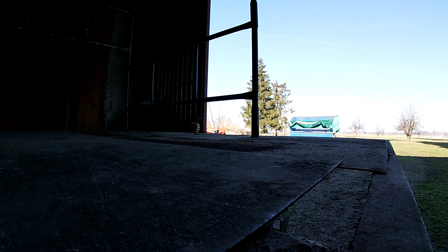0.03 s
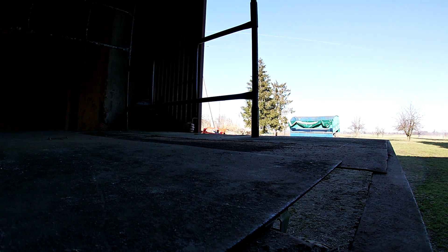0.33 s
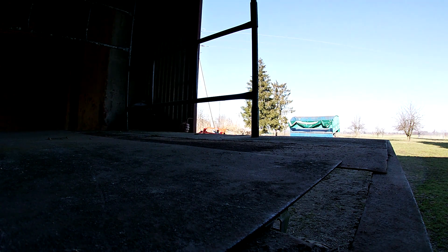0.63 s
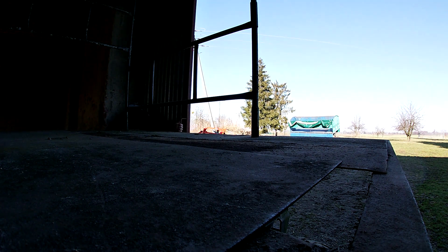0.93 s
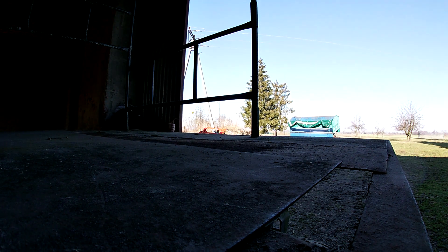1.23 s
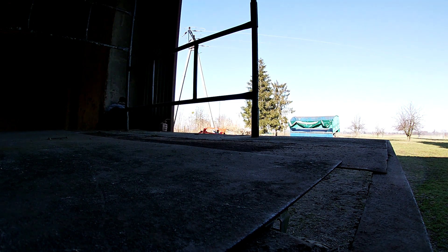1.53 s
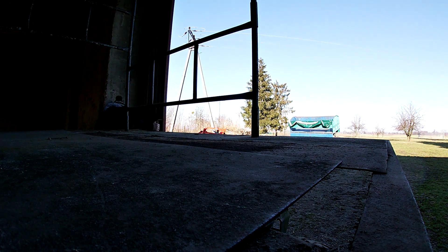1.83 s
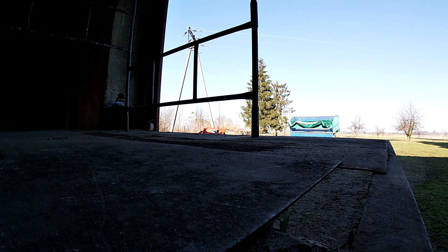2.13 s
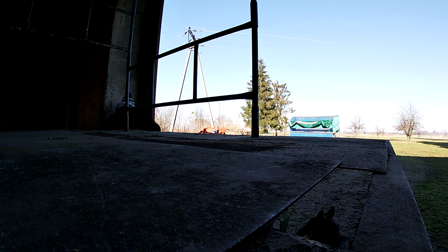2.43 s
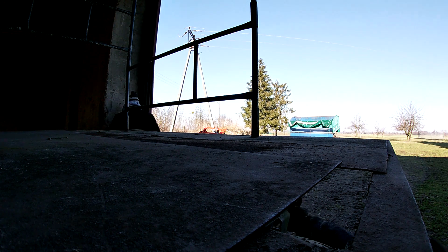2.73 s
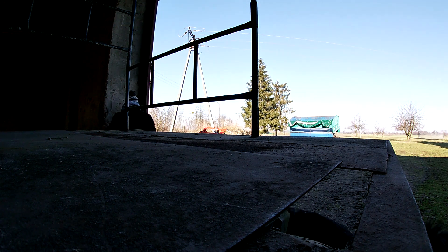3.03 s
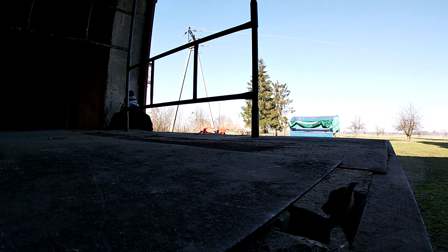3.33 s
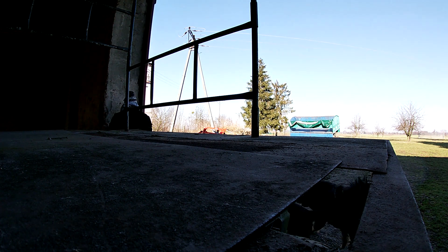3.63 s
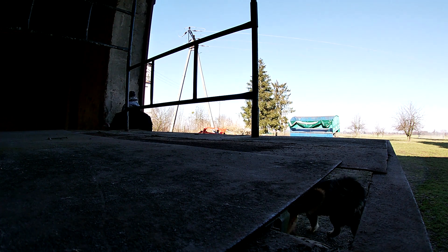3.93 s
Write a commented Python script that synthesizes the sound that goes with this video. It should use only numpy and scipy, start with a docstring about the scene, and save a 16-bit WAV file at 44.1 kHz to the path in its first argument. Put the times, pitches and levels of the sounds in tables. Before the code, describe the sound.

A heavy sheet-metal door rolls open a few metres away in a reverberant farm building. Its hangers tick lightly at first, and at about 0.7 seconds it breaks free with a dull boom. It rumbles along the track with gritty grinding, uneven knocks and rattling fittings. Its edge scrapes briefly at 2 seconds. From about 3 seconds it slows, fading toward faint outdoor air by 4 seconds.

```python
"""A rolling sheet-metal door

A heavy door rolls open along its track in a farm building, a few metres away. The hangers tick as it
takes up the push; it breaks free with a boom, and the rollers jolt the panel's modes into a rumble,
grind over grit and rattle the fittings. Halfway its edge scrapes briefly, then it slows.
The bare building reverberates."""
import sys
import numpy as np
from scipy import signal
from scipy.fft import rfft, irfft, next_fast_len
from scipy.io import wavfile

SR = 44100
rng = np.random.default_rng(int(sys.argv[2]) if len(sys.argv) > 2 else 0)


def generate_wav(sig):
    """Save sig (samples, or channels by samples) to the path in sys.argv[1] as 16-bit PCM at SR."""
    pcm = np.round(np.clip(np.atleast_2d(sig).T, -1, 1) * 32767).astype(np.int16)
    wavfile.write(sys.argv[1], SR, pcm)


N = 176400

# Modes of the panel. Each row: frequency in Hz, bandwidth in Hz, gain in dB.
PANEL_MODES = [(110.7, 9.8, -9.5), (145.4, 15.3, 4), (205.2, 32.4, -4.5), (247.2, 18.2, -1.5),
               (278.2, 25, -5), (315, 30, -6), (380.5, 43, -6), (528.2, 31, -9.5), (602, 36, -12),
               (740, 23, -18.5), (797, 19, -16.5)]
# Reverberation of the building. Each row: frequency in Hz, time to fall 60 dB in seconds.
BARN_DECAY = [(100, 0.83), (500, 0.67), (3000, 0.46), (8000, 0.33), (14000, 0.064)]

# Spectra of the sources. Each row: frequency in Hz, relative spectral density in dB.
AIR_SPECTRUM = [(35, 6), (70, -8.5), (160, -28), (325, -18), (970, -23), (1900, -30.5), (7200, -54),
                (8800, -84), (10000, -80), (12000, -94), (15000, -100)]
SHUDDER_SPECTRUM = [(10, -26), (22, -16), (30, -5.5), (37, -5), (44, -5), (54, -19), (75, -18.5),
                    (300, -99)]
TRACK_SPECTRUM = [(200, -25), (450, 1.5), (700, 3), (1000, -1), (1400, -1.5), (1800, -6.5), (2300, -13.5),
                  (3200, -11.5), (4500, -23), (7300, -26), (8800, -44), (10000, -42), (11500, -61),
                  (15000, -79)]
FINE_SPECTRUM = [(800, -26), (2200, 4), (3300, 3), (5000, 1), (7400, -3.5), (8700, -15), (10000, -17.5),
                 (11500, -28), (14000, -30), (15000, -37)]  # grit and loose fittings
SHEET_SPECTRUM = [(30, -34.5), (60, -7), (110, -3.5), (150, -5), (280, -2), (420, -8), (650, -24),
                  (1200, -26.5), (3000, -86), (10000, -110)]
HANGER_SPECTRUM = [(300, -30.5), (900, 3), (2000, -4), (3300, 1), (5000, -2), (7400, -5), (8700, -17),
                   (10200, -18), (11500, -29), (13800, -30), (15000, -53)]
LURCH_SPECTRUM = [(90, -36), (140, -2), (240, 0.5), (400, -4.5), (480, -22), (1200, -66)]
SCRAPE_SPECTRUM = [(200, -21), (500, 5), (750, 7.5), (1400, 2), (2000, -4), (3000, -8), (4500, -21.5),
                   (7300, -20.5), (9000, -40), (14000, -53)]

# Envelopes of the sustained sounds. Each row: time in seconds, relative level in dB.
SHUDDER_LEVEL = [(0.0, -43), (0.37, -33.5), (1.12, -35), (1.14, -33), (1.51, -32), (1.64, -32), (1.71, -40),
                 (1.77, -28), (1.87, -38), (2.08, -23), (2.12, -31), (2.24, -28), (2.28, -37.5),
                 (4.0, -43.5)]
GRIND_LEVEL = [(0.0, -53.5), (0.14, -46.5), (0.38, -52), (0.43, -44), (0.7, -46), (0.73, -36), (0.82, -43),
               (0.83, -36), (1.1, -35), (1.4, -39), (1.43, -35), (1.89, -34.5), (2.06, -28.5), (2.24, -34),
               (3.11, -44), (3.2, -41), (3.82, -52), (4.0, -53.5)]
FINE_LEVEL = [(0.06, -57.5), (0.29, -58), (0.34, -63), (0.42, -57), (0.46, -63), (0.58, -49.5), (0.69, -55),
              (0.71, -48.5), (0.81, -50.5), (0.85, -45), (1.51, -45.5), (1.52, -44.5), (1.93, -42),
              (2.14, -34.5), (2.23, -44), (2.34, -42.5), (2.52, -47), (3.25, -50), (3.78, -62),
              (3.98, -60.5)]  # grit and loose fittings
# Envelope of the rumble. Each row: time in seconds, level in dB, relative weight of upper modes in dB.
RUMBLE_LEVEL = [(0.02, -41, 1.5), (0.42, -36.5, -7.5), (0.69, -33, 0), (0.74, -28.5, 5), (0.87, -23, -1.5),
                (1.01, -28.5, 1.5), (1.07, -23, -0.5), (1.12, -21, 3), (1.15, -19, -11), (1.18, -24.5, 0),
                (1.26, -24, -2), (1.33, -20.5, -8.5), (1.38, -27, -1), (1.55, -24.5, -2), (1.72, -22, -1.5),
                (1.78, -24.5, 5), (1.84, -24.5, -7.5), (2.07, -25, 2.5), (2.2, -24.5, -8),
                (2.32, -20.5, -16.5), (2.37, -23, -5.5), (2.52, -28.5, -7), (2.62, -26.5, -13),
                (2.68, -29, -7.5), (2.83, -27.5, -2.5), (3.06, -26, -6), (3.2, -31, 3), (3.29, -30, 0),
                (3.44, -31, -0.5), (3.72, -40, -3), (3.98, -43.5, -3)]

# Knocks of the hangers. Each row: start in seconds, relative level in dB, treble over midrange in dB.
HANGER_KNOCKS = [(0.0473, -39.5, 6), (0.0792, -40, 19), (0.1147, -36, -6), (0.152, -40.5, 2),
                 (0.218, -36.5, -6), (0.2643, -38.5, 1.5), (0.2883, -39, -7), (0.3694, -38, 2),
                 (0.392, -37, 4), (0.4124, -30, 7), (0.4362, -34.5, 9), (0.49, -40, 2), (0.509, -33, 4),
                 (0.532, -42, 10), (0.5622, -32.5, 6), (0.582, -40, -5), (0.603, -34, 0), (0.7073, -31, 5),
                 (0.7418, -27, -16), (0.848, -31, 7), (0.882, -29, -16), (0.9433, -29, 3),
                 (0.9584, -23, -9), (1.0088, -28.5, 2), (1.067, -29.5, -12), (1.096, -33, 4),
                 (1.179, -29.5, -3), (1.2469, -27.5, -7), (1.3667, -47, 0), (1.4027, -48, -3),
                 (1.4208, -22.5, -15), (1.463, -34, -4), (1.5244, -23.5, -3), (1.5782, -29.5, -3.5),
                 (1.625, -24.5, -5), (1.6656, -25.5, -10), (1.7202, -23, -7), (1.7777, -30.5, 0),
                 (1.935, -42, -9), (1.993, -23, -25), (2.0398, -23.5, -11), (2.145, -27, 6),
                 (2.264, -30, 7), (2.3188, -26.5, 3), (2.3761, -27, -1), (2.421, -35, 7), (2.485, -32, -8),
                 (2.597, -35, 2), (2.6573, -35, 8), (2.8913, -36.5, 0), (2.9684, -30.5, -11),
                 (3.0934, -36.5, 3), (3.1591, -30, -4.5), (3.2936, -41, 2), (3.333, -43, 0),
                 (3.3512, -35.5, -6), (3.415, -40.5, 2), (3.592, -33.5, -10), (3.77, -52, 7),
                 (3.8252, -45, -1)]
# Uneven spots in the track. Each row: start in seconds, relative level in dB,
# clank over boom in dB, centre of the boom in Hz.
TRACK_BUMPS = [(.29, -26.5, -24, 205), (.385, -23.5, -21, 144), (.51, -20.5, -18, 145),
               (.62, -23.5, -24, 145), (0.717, -18.5, -20, 280), (0.745, -12, -23, 220),
               (.829, -15.5, -15, 320), (0.853, -16, -21, 240), (1.06, -12.5, -11, 250),
               (1.101, -17.5, -16, 245), (1.136, -15, -27, 144), (1.228, -14, -20, 205),
               (1.311, -19, -24, 162), (1.41, -11.5, -15, 218), (1.53, -11.5, -10, 250),
               (1.625, -14.5, -18, 145), (1.679, -14.5, -13, 280), (1.786, -18, -11, 205),
               (1.821, -13, -21, 160), (1.865, -11.5, -30, 205), (1.931, -13.5, -8.5, 245),
               (2.176, -15, -15, 144), (2.232, -16, -18, 145), (2.317, -15.5, -16, 159),
               (2.42, -18, -20, 145), (2.713, -12.5, -22, 213), (2.842, -14.5, -21, 280),
               (2.9, -21, -24, 205), (2.97, -25, -13, 205), (3.039, -21.5, -23, 190),
               (3.279, -18.5, -24, 205), (3.342, -19.5, -22, 160), (3.602, -25.5, -13, 324),
               (3.766, -30.5, -24, 247)]


def amp(db):
    """Amplitude ratio for a level in decibels."""
    return 10 ** (np.asarray(db) / 20)


def unit(x):
    """The signal scaled to an rms of 1."""
    return x / np.sqrt(np.mean(x ** 2) + 1e-20)


def evened(x, span_s=0.07):
    """Division by the running rms holds a signal near an rms of 1."""
    window = np.hanning(int(span_s * SR))
    power = abs(signal.fftconvolve(x * x, window / window.sum(), "same"))
    return x / np.sqrt(power + np.mean(x * x) / 20)


def along(points, hz):
    """Interpolation of (Hz, value) points on a logarithmic frequency axis."""
    f, values = np.transpose(points)
    return np.interp(np.log(hz + 1), np.log(f + 1), values)


def curve(rows):
    """Linear interpolation of (seconds, value) points at every sample."""
    return np.interp(np.arange(N) / SR, *np.transpose(rows))


def filtered(x, response):
    """Linear filtering: the spectrum is multiplied by a frequency response."""
    size = next_fast_len(len(x) + 8192)
    return irfft(rfft(x, size) * response(np.fft.rfftfreq(size, 1 / SR)), size)[:len(x)]


def coloured(x, spectrum, size=4096):
    """Minimum-phase filtering: folding the cepstrum gives a causal filter with this spectrum."""
    cepstrum = irfft(np.log(amp(along(spectrum, np.fft.rfftfreq(size, 1 / SR)))))
    cepstrum[1:size // 2] *= 2
    cepstrum[size // 2 + 1:] = 0
    return signal.fftconvolve(x, irfft(np.exp(rfft(cepstrum))))[:len(x)]


def dying(t, t60_s):
    """Exponential decay, 60 dB in t60_s."""
    return np.exp(-np.log(1000) * t / t60_s)


def swell(t, rise_s, fall_at_s, t60_s):
    """An envelope that rises linearly, holds, then decays exponentially."""
    return np.minimum(t / rise_s, 1) * dying(np.maximum(t - fall_at_s, 0), t60_s)


def add(track, start_s, sound):
    """Superposition of a sound on the track."""
    i = max(round(start_s * SR), 0)
    track[i:i + len(sound)] += sound[:max(N - i, 0)]


def contacts(per_s, scatter_db):
    """A Poisson train of impulses of uneven size and either sign."""
    hit, size = rng.random(N) < per_s / SR, rng.standard_normal(N)
    return hit * rng.choice([-1, 1], N) * amp(scatter_db * np.clip(size, -2, 2))


def panel(force, cutoff_hz=1100):
    """The sheet responds as a sum of damped modes; its mass suppresses the treble."""
    def response(f):
        modes = sum((-1) ** k * amp(db) * 1j * f * width / (hz * hz - f * f + 1j * f * width)
                    for k, (hz, width, db) in enumerate(PANEL_MODES))
        return modes / (1 + 1.4j * f / cutoff_hz - (f / cutoff_hz) ** 2)
    return filtered(force, response)


def barn(x, wet_db, positions=61):
    """Direct sound plus diffuse reverberation, cross-faded from place to place as the door travels."""
    echo, step = np.zeros(N), N // (positions - 1)
    hz, t, noise = signal.stft(rng.standard_normal((positions, SR // 3)), SR, nperseg=256)
    tails = signal.istft(noise * dying(t, along(BARN_DECAY, hz)[:, None]), SR)[1]
    for k, tail in enumerate(tails):
        at = np.arange(max((k - 1) * step, 0), min((k + 1) * step, N))
        share = np.sqrt(np.maximum(1 - abs(at / step - k), 0))
        add(echo, at[0] / SR, signal.fftconvolve(x[at] * share, tail / np.linalg.norm(tail)))
    return (x + amp(wet_db) * echo) / np.sqrt(1 + amp(wet_db) ** 2)


def air(level_db=-41):
    """Stationary noise, strongest in the bass, forms the quiet outdoor background."""
    return amp(level_db) * unit(coloured(rng.standard_normal(N), AIR_SPECTRUM))


def shudder(gain_db=1):
    """Whole-body vibration: the door shakes at low frequency on its hangers."""
    shaking = filtered(rng.standard_normal(N), lambda hz: amp(along(SHUDDER_SPECTRUM, hz)))
    return unit(shaking) * amp(curve(SHUDDER_LEVEL) + gain_db)


def grinding(coarse_db=1, fine_db=-4):
    """Rolling noise: dense tiny impacts as the rollers grind along the track and crush rust and grit."""
    coarse = barn(coloured(contacts(per_s=1800, scatter_db=1.5), TRACK_SPECTRUM), wet_db=-6)
    fine = barn(coloured(contacts(per_s=4500, scatter_db=2.5), FINE_SPECTRUM), wet_db=-4)
    return (unit(coarse) * amp(curve(GRIND_LEVEL) + coarse_db)
            + unit(fine) * amp(curve(FINE_LEVEL) + fine_db))


def rumble(split_hz=235.5, upper_db=1):
    """Forced vibration: roller jolts keep the modes ringing, in a balance set by where the rollers are."""
    jolts, rows = contacts(per_s=400, scatter_db=2), np.array(RUMBLE_LEVEL)
    ringing = unit(barn(panel(jolts), wet_db=-0.5))
    broadband = unit(barn(coloured(jolts, SHEET_SPECTRUM), wet_db=3.5))
    body = unit(ringing + broadband)
    lower = filtered(body, lambda hz: 1 / (1 + (hz / split_hz) ** 8))
    upper_gain = amp(curve(rows[:, [0, 2]]) + upper_db)
    balanced = (evened(lower) + upper_gain * evened(body - lower)) / np.hypot(1, upper_gain)
    return balanced * amp(curve(rows[:, :2]))


def rattling(gain_db=-5.5):
    """Intermittent contact: loose fittings chatter at random, harder where the track is rougher."""
    t = np.arange(SR // 4) / SR
    strikes = contacts(per_s=110, scatter_db=2)
    bursts = signal.fftconvolve(abs(strikes), dying(t, t60_s=0.012))[:N]
    chatter = barn(coloured(bursts * rng.standard_normal(N), FINE_SPECTRUM), wet_db=-3.5)
    return unit(chatter) * amp(curve(FINE_LEVEL) + gain_db)


def clacks(split_hz=2500, crack_db=-21, gain_db=-9):
    """Steel-on-steel impacts of the hangers are brief, hence broadband: a crack and a short buzz."""
    out, t = np.zeros(N), np.arange(SR // 4) / SR
    envelope = dying(t, t60_s=0.074) + amp(crack_db) * dying(t, t60_s=0.015)
    for start_s, db, bright_db in HANGER_KNOCKS:
        knock = coloured(rng.standard_normal(len(t)) * envelope, HANGER_SPECTRUM)
        midrange = signal.lfilter(*signal.butter(1, split_hz, fs=SR), knock)
        knock = knock + (amp(-bright_db) - 1) * midrange
        add(out, start_s, amp(db + gain_db) * knock / np.std(knock[:SR // 200]))
    return barn(out, wet_db=-2.5)


def bumps(focus_q=2.25, gain_db=-13):
    """Impact excitation: a roller drops, the track clanks and the modes driven from that spot boom."""
    out, t = np.zeros(N), np.arange(SR // 2) / SR
    onset = slice(SR // 20)  # the first 50 ms set the level
    for start_s, db, clank_db, hz in TRACK_BUMPS:
        ring = panel(rng.standard_normal(len(t)) * dying(t, t60_s=0.083))
        boom = filtered(ring, lambda f: 1j * f * hz / (focus_q * (hz * hz - f * f) + 1j * f * hz))
        clank = coloured(rng.standard_normal(len(t)) * dying(t, t60_s=0.25), TRACK_SPECTRUM)
        bump = boom / np.std(boom[onset]) + amp(clank_db) * clank / np.std(clank[onset])
        add(out, start_s, amp(db + gain_db) * bump)
    return out


def lurch(start_s=0.71, boom_db=-20.5, hum_hz=141.2, hum_db=-21.5):
    """Free vibration: the door breaks loose with a dull boom, and a low mode of the panel hums on."""
    t = np.maximum(np.arange(N) / SR - start_s, 0)
    noise = evened(coloured(rng.standard_normal(N), LURCH_SPECTRUM))
    boom = noise * swell(t, rise_s=0.0063, fall_at_s=0.034, t60_s=0.36)
    hum = np.sin(2 * np.pi * hum_hz * t) * swell(t, rise_s=0.083, fall_at_s=0.083, t60_s=0.79)
    return amp(boom_db) * boom + amp(hum_db) * hum


def scrape(start_s=1.991, level_db=-28):
    """Stick-slip friction: the door's edge catches and rubs briefly in dense, harsh slips."""
    t = np.maximum(np.arange(N) / SR - start_s, 0)
    pressure = swell(t, rise_s=0.0017, fall_at_s=0.0887, t60_s=0.5)
    slips = unit(coloured(contacts(per_s=1300, scatter_db=0.5), SCRAPE_SPECTRUM))
    return amp(level_db) * barn(slips * pressure, wet_db=-14)


def scene():
    """Sound pressures add: the door's sources and the background sum in one channel."""
    door = lurch() + rumble() + bumps() + grinding() + rattling() + clacks() + scrape() + shudder()
    return (door + air())[None]


def record(dry):
    """Band limiting: an ideal low-pass filter removes everything above 14.9 kHz."""
    return filtered(dry[0], lambda hz: hz < 14900)[None]


dry = scene()
out = record(dry)
generate_wav(out)
```